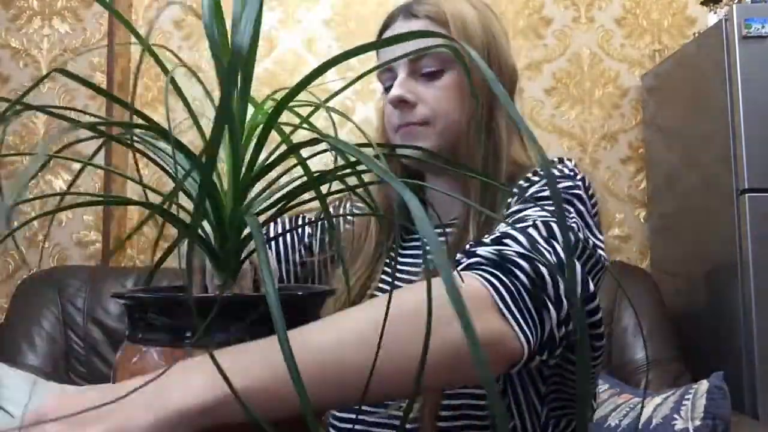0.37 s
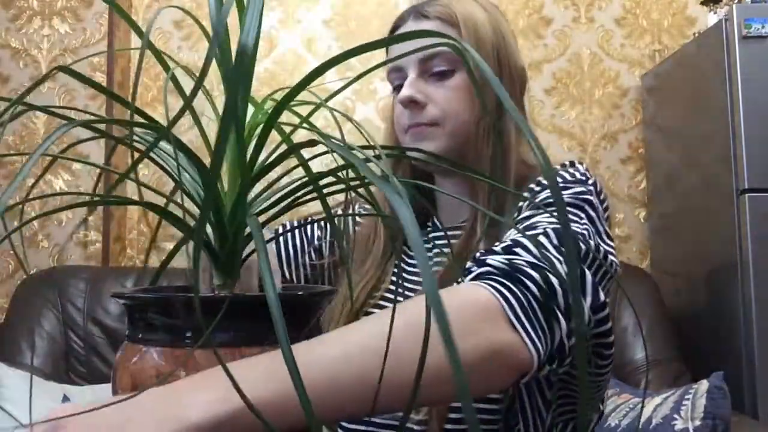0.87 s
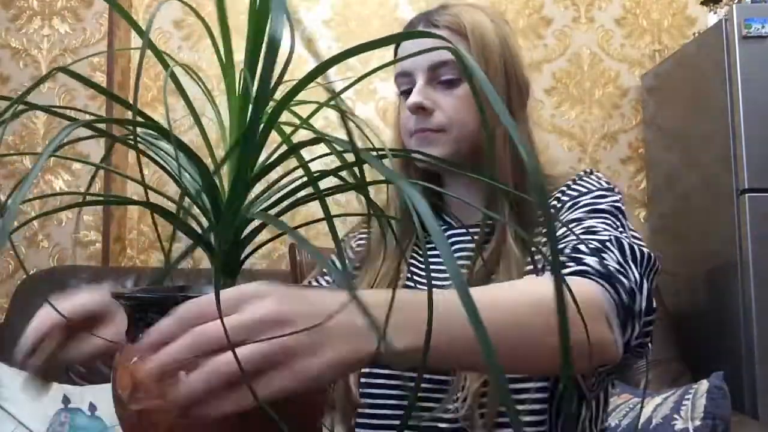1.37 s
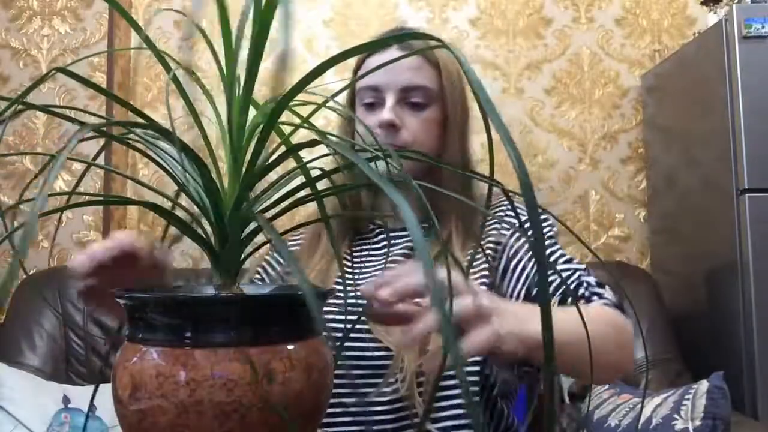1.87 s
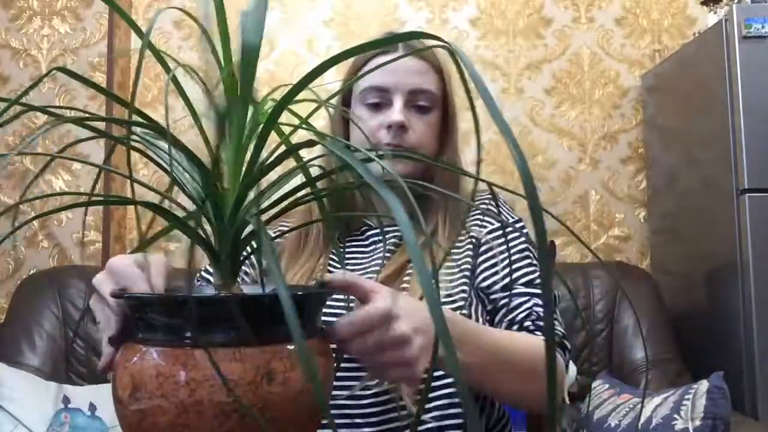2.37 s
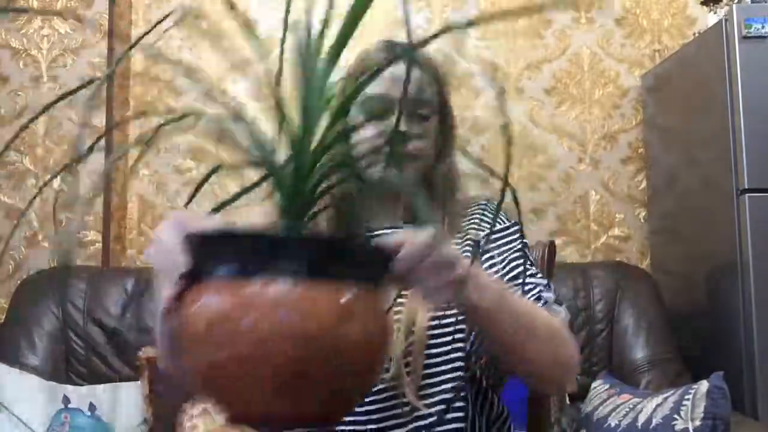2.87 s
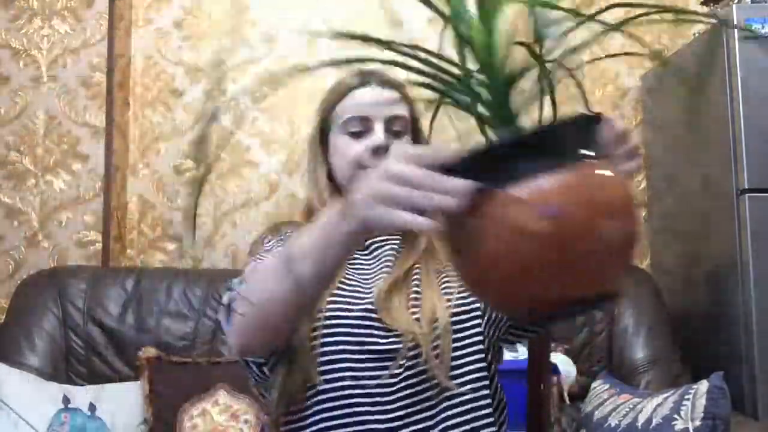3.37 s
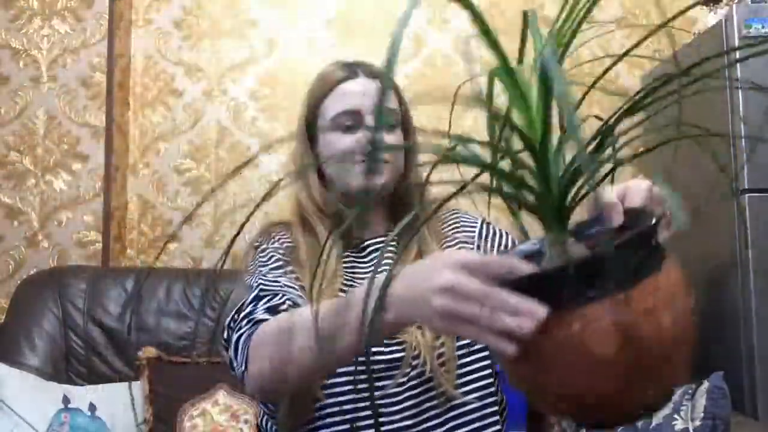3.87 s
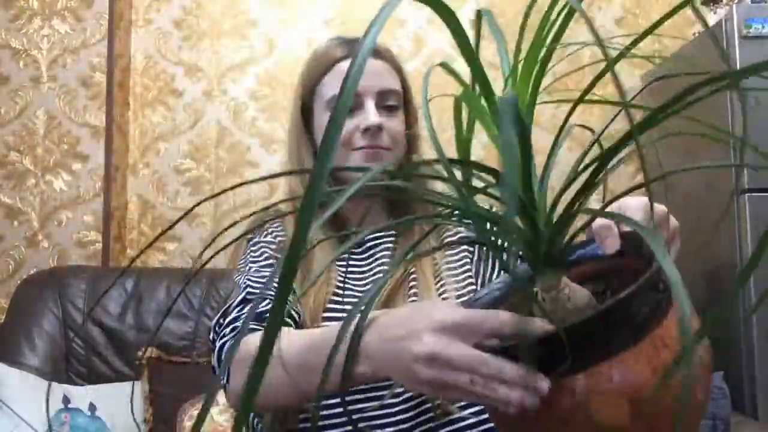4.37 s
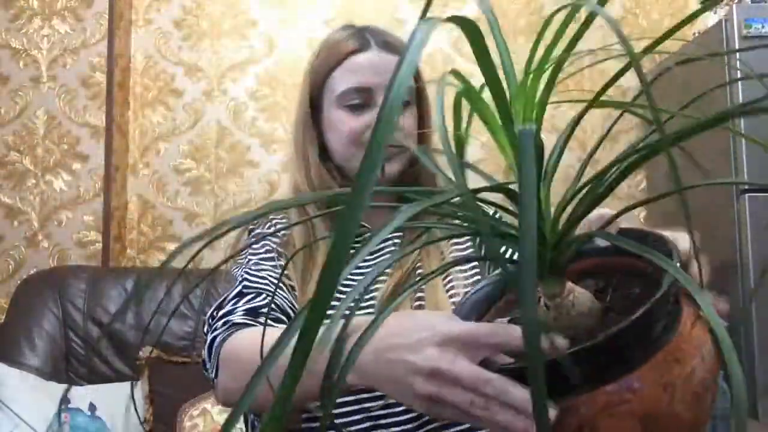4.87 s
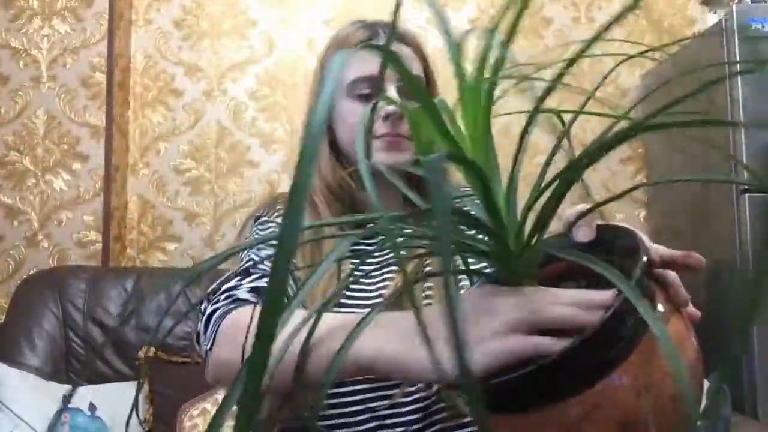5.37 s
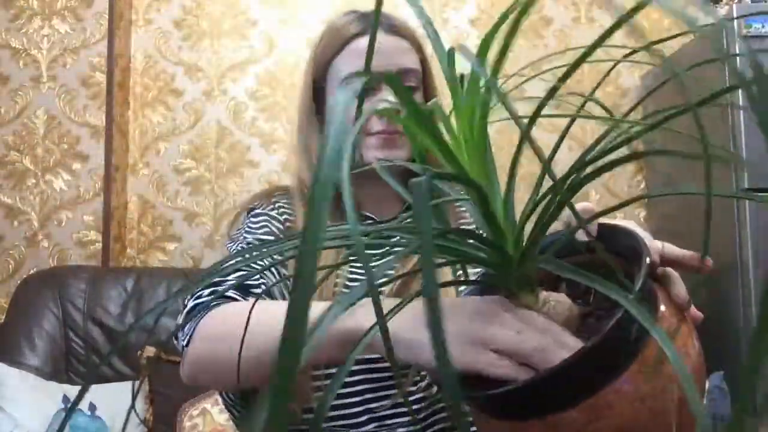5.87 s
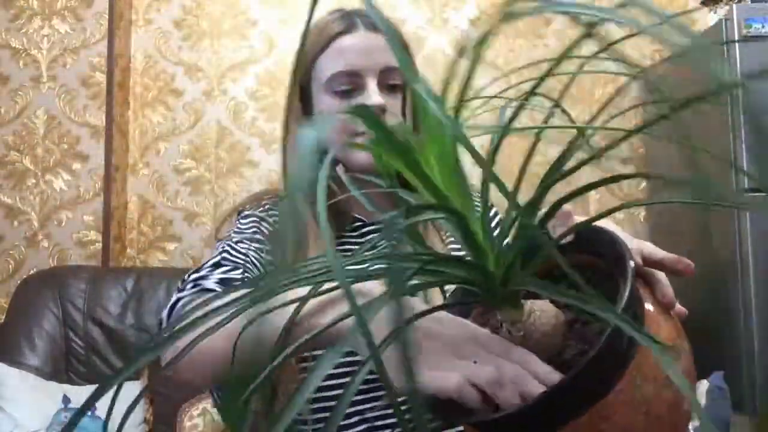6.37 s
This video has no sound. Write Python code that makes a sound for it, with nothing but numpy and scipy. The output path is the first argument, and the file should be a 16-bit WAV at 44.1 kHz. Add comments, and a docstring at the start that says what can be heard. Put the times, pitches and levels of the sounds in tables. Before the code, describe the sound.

Quiet rustling in a living room, a sudden rattling topple, later one deep pot thud, then fingers ticking and scratching through dry soil.

```python
"""A light hollow object topples and clatters to rest on a table: impulsive contacts excite its decaying modes.
A heavy clay pot is dragged and set down with a thud, and fingers tap it faintly: soft pushes ring a set of modes,
friction is noise about a pitch. Stiff leaves and fingers in the soil rustle and tick (noise bursts, fine grains),
with two woody taps at the end; a hand sets something light down, a finger rubs the glaze and a ring clinks on it.
The furnished living room adds a diffuse tail and a faint hum of filtered noise."""
import sys
import numpy as np
from scipy import signal
from scipy.io import wavfile

SR = 44100
rng = np.random.default_rng(int(sys.argv[2]) if len(sys.argv) > 2 else 0)


def decibels_to_gain(level_db):
    """Convert a level in decibels to a linear amplitude gain (20 dB per decade)."""
    exponent = np.asarray(level_db, float) / 20
    return 10 ** exponent


def wrap_up_sound(samples):
    """Save the sound to the file named by the first command line argument, as 16-bit audio."""
    columns = np.atleast_2d(samples).T
    # keep every value between -1 and 1, then stretch to whole-number steps
    tamed = np.clip(columns, -1, 1)
    steps = np.round(tamed * 32767).astype(np.int16)
    wavfile.write(sys.argv[1], SR, steps)


N = 286650

# hard contacts of the toppling object; the gentlest are softened further in clatter():
# (time [s], crack peak [dB], body ring re crack [dB], crack pitch [Hz])
CONTACTS = [(1.6124, -34.5, 18, 2520), (1.6214, -14, 8, 2170), (1.6295, -21, -5.5, 1720),
            (1.6445, -30, 6, 3080), (1.6776, -32.5, -7, 4770), (1.6951, -11, -12, 3330),
            (1.704, -8.5, -6, 2480), (1.7215, -39, -1, 3600), (1.7578, -2.5, -1.5, 2800),
            (1.7922, -10, -4.5, 3770), (1.7947, -5, -15.5, 3130), (1.799, 1.5, -7.5, 2950),
            (1.8187, -18, -2, 3302), (1.8216, -14.5, 1.5, 2977), (1.831, -23, -6, 3200),
            (1.847, -16.5, -1, 3070), (1.8574, -15, 3, 2930), (1.879, -12.5, -23, 2550),
            (1.8865, -15.5, 0.5, 3330), (1.902, -23, 1, 2900), (1.9097, -24, 6.5, 3050),
            (1.9359, -26, -2, 3300), (1.9455, -32, -9, 3500), (1.968, -31.5, -15, 3660),
            (1.9727, -31, -17, 3600), (2.0009, -34.5, 1.5, 1800), (2.048, -43, 5, 1500),
            (2.0834, -44.5, 14.5, 1920), (2.1522, -54, 14, 900), (2.167, -42, -4, 3600),
            (2.1818, -49, 13.5, 1710), (2.231, -43.5, 7.5, 1885), (2.274, -60.5, 10, 1400),
            (2.289, -51, 11.5, 1880), (2.3206, -50.5, 9.5, 1900), (2.343, -60, 7, 1000),
            (2.358, -58, 9.5, 1704), (2.3821, -54.5, 8.5, 1485), (2.432, -58.5, 8, 1100)]
# dense small contacts while it rocks and slides: (time [s], level [dB])
ROCKING_LEVEL = [(1.615, -36.5), (1.66, -33.5), (1.69, -34.5), (1.73, -36.5), (1.75, -37.5), (1.82, -30),
                 (1.89, -31.5), (1.97, -41), (2.06, -55.5)]
# modes of the hollow object: (frequency [Hz], level [dB], t60 [s])
HOLLOW_MODES = [(235, -7, .07), (280, -6, .07), (330, -5, .06), (385, -9, .05), (440, -8, .05),
                (535, -5, .07), (585, -5, .065), (665, -8, .04), (790, -7, .04), (870, -2, .05),
                (975, -6, .05), (1150, -3, .035), (1340, -1, .03), (1520, 0, .03), (1690, 0, .025),
                (1830, 0, .03), (2080, -4, .025), (2340, -4, .025), (2600, -6, .02), (2900, -7, .018),
                (3200, -8, .016), (3500, -9, .015), (3900, -12, .012), (4400, -14, .012), (5000, -16, .01)]
# a gentle contact stirs only some of the modes: (frequency [Hz], level [dB])
GENTLE_EXCITATION = [(250, -7), (440, -5.5), (560, 5), (670, -11.5), (870, -7.5), (975, 0), (1150, -5.5),
                     (1520, -14.5), (1830, -3.5), (2080, -5), (5000, -28.5)]
CRACK_EDGE_DB = -34.5  # bright edge of a crack, re its table peak
SCRAPE_EDGE_DB, SPRAY_DB, DRUM_DB = -13.5, -29.5, 3  # small contacts: bright edge, faint spray, drumming on the table
TOP_HZ = 5530  # the body is dull above
# then it wobbles softly to rest
WOBBLE_FROM_S, WOBBLE_TO_S, WOBBLE_DB, WOBBLE_FADE_DB_PER_S = 2.02, 2.52, -51, -14

# soft blows: the pot landing on the table, and faint finger taps on the pot:
# (time [s], peak [dB], push pitch [Hz], grit re peak [dB])
SOFT_BLOWS = [(.004, -50.5, 364, -35), (4.41, -34.5, 300, -16), (4.4196, -4.5, 312, -34.5),
              (4.4313, -9.5, 266, -36), (4.4436, -21.5, 670, -24), (4.4525, -34, 325.4, -22),
              (4.466, -30.5, 334, -21), (4.484, -26, 403, -27), (4.491, -44, 450, -28),
              (4.508, -29, 130, -32), (4.527, -31, 150, -28), (4.179, -52, 734, -23),
              (4.349, -51.5, 745, -16), (4.732, -45, 810, -21), (4.756, -34, 555, -33),
              (5.2890, -42, 674, -23), (6.229, -54, 198, -24)]
# modes that the soft blows ring, those of the table: (frequency [Hz], level [dB], t60 [s])
TABLE_MODES = [(121, 2, 0.1), (143, -8, 0.14), (222.3, -2, 0.07), (208, -3.5, 0.042), (256, -1.5, 0.018),
               (320, -4, 0.0312), (386, 2.5, 0.036), (474, -10.5, 0.094), (598, -4, 0.038),
               (642, -7, 0.092), (710, 1.5, 0.02896), (863, 3, 0.023), (1013, -1, 0.045), (1192, 1, 0.032),
               (1365, 2.5, 0.055), (1560, 3, 0.024), (1800, 7.5, 0.03)]
# what a blow sends through the table top into the microphone, re the blow's peak
THUMP_DB, THUMP_HZ, THUMP_T60_S = -31.5, 70, 0.34

# the pot's foot sliding before it lands: the rub starts high and broad, sinks and narrows as the weight settles
SLIDE_FROM_S, SLIDE_TO_S, SLIDE_RISE_S, SLIDE_DB = 4.04, 4.45, 0.1, -55
SLIDE_START_HZ, SLIDE_END_HZ, SETTLED_S, SETTLING_S = 332.8, 208, 4.23, 0.035

# a hand sets something light down: (time [s], peak [dB])
SET_DOWN = [(0.9218, -35), (0.938, -50.5), (0.968, -50), (1.018, -56.5)]
# modes of that light object: (frequency [Hz], level [dB], t60 [s])
LIGHT_MODES = [(242, -14, 0.15), (297, 4, 0.059), (365, -9, 0.023), (470, -17, 0.077), (612, -12, 0.064),
               (900, -15, .03), (970, -17, 0.065), (1200, -7, 0.018), (1730, -11, .025)]
KNOCK_SOFT_HZ = 900  # top of the soft push

# leaves and crumbs snapping, and at the end two woody taps:
# (time [s], peak of the body [dB], pitch [Hz], bright edge re peak [dB], broad noise re ringing [ratio])
SNAPS_AND_TAPS = [(0.0433, -54, 1900, -1.5, 1.2), (0.1191, -45.5, 1850, -32, 9.1),
                  (0.4209, -49, 4040, -11, 0.83), (0.5574, -64, 4190, -17, 0.51),
                  (1.2555, -49.5, 5250, -30, 0.91), (1.261, -41, 4670, -24, 0.85),
                  (1.3004, -53, 4430, -23, 2.1), (1.3927, -54, 2960, -23, 0.93), (2.4583, -54, 2800, -7, 2),
                  (2.5694, -56.5, 4500, -8, 1.67), (2.7034, -51, 4210, -11, 1.44),
                  (2.9682, -52, 6910, -19.5, 0.88), (3.2573, -55.5, 7970, -11.5, 0.81),
                  (3.4114, -58.5, 1428, -20, 1.2), (3.6671, -60, 1955, 3.5, 1.47),
                  (3.714, -57.5, 1470, 0, 1.4), (3.9569, -63, 1440, -16, 1.05),
                  (3.961, -52, 2200, -18, 1.9), (4.0514, -56.5, 7340, -13.5, 1.4),
                  (4.1091, -56, 2060, 0, 1.3), (4.1784, -45, 3200, -22.5, 2.6),
                  (4.3096, -45.5, 3660, -14.5, 3.8), (4.348, -43, 2920, -22, 2.7),
                  (4.4209, -34, 2050, -34, 0.86), (4.4304, -59, 3200, -19.5, 0.47),
                  (4.4445, -49.5, 2380, -19.5, 0.66), (4.5615, -45, 3030, -24, 5.6),
                  (4.7297, -39.5, 4200, -18, 0.58), (4.7526, -41, 2630, -20, 1.5),
                  (4.7795, -40, 2790, -27, 3.3), (4.8034, -66, 2880, -21, 1.2), (5.0, -50, 4440, -23, 1.4),
                  (5.0781, -59.5, 1395, -21, 1.6), (5.2883, -44, 1474, -13, 4.2),
                  (5.3707, -55, 1400, -15, 1.2), (5.4174, -55.5, 4550, -12, 1.2),
                  (5.5426, -51.5, 1920, -0.5, 1.2), (5.6576, -32, 3200, -18.5, 11),
                  (5.6823, -42.5, 2260, -12, 2.2), (5.7124, -48, 4970, 1.5, 1.1),
                  (5.7942, -50.5, 2620, -21, 0.73), (5.882, -56, 2940, -14.5, 1),
                  (6.0871, -49.5, 3820, -16, 1.6), (6.2342, -34, 3980, -25, 3.9),
                  (6.2802, -51, 4300, -20, 1.1), (6.4834, -59.5, 4010, -22, 1.3),
                  (6.318, -46, 1560, -20, 0.2), (6.3265, -47, 1584, -20, 0.14)]
SNAP_RISE_S, SNAP_FALL_S = 0.0036, 0.0021  # time constants
# the many snaps too faint to point at; FAINT_SNAP_DB is the weakest
FAINT_SNAPS_PER_S, FAINT_SNAP_DB, FAINT_EDGE_DB, FAINT_BROAD_SHARE = 3.9, -67, -7.5, 1.6

# stiff leaves swishing along each other: (time [s], spread of the swell [s], level [dB], pitch [Hz])
LEAF_SWISHES = [(1.1, .03, -76, 3900), (2.594, .01, -73, 3000), (2.687, .015, -67.5, 4240),
                (2.69, .015, -71.5, 7720), (2.756, .015, -69.5, 3810), (2.815, 0.01, -71, 1510),
                (2.845, .02, -77, 4500), (3.046, .015, -74, 5170), (3.072, .012, -71, 6040),
                (3.184, .01, -77, 6000), (4.202, 0.024, -69, 3600), (4.277, 0.006, -65, 4300),
                (4.29, 0.012, -68.5, 3200), (4.372, 0.009, -63, 2830), (4.765, 0.023, -83, 2000),
                (5.8, 0.026, -66, 2840), (5.91, 0.015, -73.5, 2940)]

# hands at work: (time [s], rustle level [dB], rumble of forearms and sleeves on the table [dB])
HAND_LEVELS = [(0, -68.5, -62.5), (.33, -73.5, -70.5), (.6, -77, -67), (.92, -80.5, -68.5),
               (1.08, -72, -69.5), (1.58, -70, -64), (2.5, -73, -68), (2.65, -70.5, -69.5),
               (3.0, -70.5, -70), (3.4, -74.5, -69), (3.9, -72.5, -69), (4.4, -68.5, -62.5),
               (4.93, -67, -61.5), (5.35, -69, -66), (5.65, -60.5, -63), (5.87, -70, -64),
               (6.1, -65.5, -64.5), (6.3, -68.5, -63), (6.5, -69, -66)]
# leaves brushing past skin or rim: (time [s], rustle level [dB], sheen re rustle [dB], time constant [s])
LEAF_BRUSHES = [(0.051, -61, -16, 0.0052), (0.392, -89, 11, 0.017), (0.632, -95, 5, 0.013),
                (0.77, -77.5, -0.5, 0.023), (0.921, -74, -4, 0.015), (1.267, -54, -25, 0.0045),
                (2.704, -68, 3, 0.011), (2.97, -78, 10, 0.011), (3.269, -72.5, -6.5, 0.037),
                (3.48, -80.5, 1.5, 0.019), (3.79, -78, 3, 0.052), (3.967, -60.5, -10, 0.014),
                (4.197, -65.5, -7, 0.027), (4.315, -68, 6, 0.007), (4.808, -58.5, -34, 0.068),
                (5.088, -64, -3.5, 0.019), (5.158, -67.5, 2, 0.0093), (5.474, -73.5, 10.5, 0.014),
                (5.665, -56.5, 5.5, 0.01), (5.716, -66, 9, 0.01), (6.089, -61.5, -4, 0.015),
                (6.239, -52.5, -16.5, 0.007), (6.5, -58.5, -18, 0.02)]
# relative spectral density of the rustle: (frequency [Hz], level [dB])
RUSTLE_SPECTRUM = [(290, -42.5), (500, 6.5), (689, 2), (1220, 0), (1840, 0), (1990, -4), (2960, -1),
                   (3380, -5), (4310, -2), (7000, -15.5), (9100, -40), (15400, -120)]
# relative spectral density of the dry treble of the rustle: (frequency [Hz], level [dB])
SHEEN_SPECTRUM = [(3530, -34), (6000, -9.5), (7640, 1.5), (8650, -6.5), (11100, -6), (16000, -12.5)]
SHEEN_DB, SHEEN_WANDER_DB = -9, 3.5  # dry treble re rustle, and rms of its wandering
# relative spectral density of the arms on the table: (frequency [Hz], level [dB])
ARMS_SPECTRUM = [(24, -43), (40, -13), (70, 1), (124, 1), (172, -3.5), (218, 0), (271, -4), (900, -16),
                 (1170, -39), (1980, -120)]

# pressure of the finger rubbing the glaze: (time [s], level [dB])
RUB_PRESSURE = [(5.73, -69), (5.8, -69.5), (5.87, -77.5), (5.92, -77.5), (5.97, -71), (6.1, -75),
                (6.24, -76.5)]
# tones of the rub: (frequency [Hz], level [dB], share of the pitch lift [ratio])
RUB_PITCHES = [(865, 4.5, 0.089), (2480, 5, 0.83), (4180, -1.5, 0.0072)]
RUB_FROM_S, RUB_TO_S, RUB_RISE_S = 5.73, 6.24, 0.022
RUB_SHARP, RUB_SLOWING_S = 0.16, 0.07  # pitch lift of the quick start at full share; time constant of slowing
RUB_STUTTER_DB = 3  # rms; the skin grips and lets go

# finger ring on the glaze:
# (time [s], level [dB], t60 of the lowest mode [s], upper modes re lowest [dB])
RING_CLINKS = [(3.785, -61, 0.52, -5), (3.816, -77, 0.9, -30), (4.084, -73.5, 0.49, -25),
               (4.147, -66.5, 0.32, -5.5), (5.15, -58, 0.18, -3.5)]
# modes of the pot; the clinks give the lowest its level and t60: (frequency [Hz], level [dB], t60 [s])
POT_MODES = [(2572, 0, .4), (5593, -8, .1), (7920, 0, .13)]

# relative spectral density of the room's hum: (frequency [Hz], level [dB])
HUM_SPECTRUM = [(15, -40), (25, -12), (74, 2.5), (212, 4), (427, -5.5), (607, -11), (1130, -18),
                (1400, -14), (6050, -29), (6920, -14), (8360, -37), (12200, -31), (16000, -45.5)]
HUM_DB = -74

# decay of the room: (frequency [Hz], t60 [s])
ROOM_DECAY = [(100, 0.22), (300, 0.34), (1000, 0.3), (4000, 0.16), (10000, 0.3)]
# soft furniture swallows the treble: (frequency [Hz], relative level [dB])
ROOM_TINT = [(200, -0.5), (1500, -1.5), (3500, -4.5), (6000, -8), (12000, -7)]
ROOM_DB = -10.5


def clatter():
    """Modal impact: each contact cracks and strikes every mode of the hollow body with a strength of its own."""
    contacts, out, edges = np.array(CONTACTS), np.zeros(N), np.zeros(N)
    times, peaks_db, bodies_db = contacts[:, :3].T
    white = rng.standard_normal((len(contacts), 400)) * np.exp(-np.arange(400) / (0.0005 * SR))
    white[:, 0] = 4.0  # the first touch leads
    weak = np.clip((-30 - peaks_db) / 10, 0, 1)  # gentle contacts sound duller
    for (s, peak_db, body_db, hz), burst, soft in zip(contacts, white, weak):
        crack = peak_one(band_pass(burst, hz / 2.0, hz * 1.3, order=3))
        add(out, s, decibels_to_gain(peak_db - 12 * soft) * crack)
        edge = peak_one(band_pass(burst, 5000, 9000))
        add(edges, s, decibels_to_gain(peak_db + CRACK_EDGE_DB) * edge)
    shape = (len(contacts), len(HOLLOW_MODES))
    strikes = decibels_to_gain(3 * rng.standard_normal(shape)) * rng.choice([-1, 1], shape)
    small = during(ROCKING_LEVEL) * decibels_to_gain(in_time(ROCKING_LEVEL)[0]) * grains(700, spread_db=3)
    wobble_db = WOBBLE_DB + WOBBLE_FADE_DB_PER_S * (np.arange(N) / SR - WOBBLE_FROM_S)
    wobble = swell(WOBBLE_FROM_S, WOBBLE_TO_S, 0.027) * decibels_to_gain(wobble_db) * grains(110, spread_db=4)
    for k, (hz, level_db, t60) in enumerate(HOLLOW_MODES):
        dull_db = -6 * max(np.log2(hz / 1900), 0)
        gentle_db = at_hz(GENTLE_EXCITATION, hz)
        wobble_dull_db = -8.6 * max(np.log2(hz / 800), 0)
        touches = decibels_to_gain(dull_db) * small + decibels_to_gain(gentle_db + wobble_dull_db) * wobble
        # long modes gather more energy: divide it out
        clicks = touches * rng.standard_normal(N) / np.sqrt(SR * t60)
        blow = decibels_to_gain(peaks_db + bodies_db + weak * gentle_db) * strikes[:, k]
        clicks[np.round(times * SR).astype(int)] += blow / np.sqrt(len(HOLLOW_MODES))
        out += decibels_to_gain(level_db) * ring(clicks, hz, t60)
    out += decibels_to_gain(SCRAPE_EDGE_DB) * band_pass(small, 2200, 4300)
    edges += decibels_to_gain(SPRAY_DB) * band_pass(small, 5800, 9000)
    drumming = decibels_to_gain(DRUM_DB) * band_pass(small, 200, 380)
    # a small light body has little bass and a dull top
    return band_pass(out, 200, TOP_HZ, order=4) + edges + drumming


def soft_blows():
    """Soft impact: a push, broad around its pitch, rings a set of modes; grit adds a short knock."""
    out, click = np.zeros(N), np.eye(1, SR // 3)[0]
    grit = rng.standard_normal((len(SOFT_BLOWS), 3000)) * np.exp(-np.arange(3000) / (0.011 * SR))
    for (s, peak_db, hz, grit_db), burst in zip(SOFT_BLOWS, grit):
        push = band_pass(click, hz / 2.08, hz * 1.665, order=3)
        body = sum(decibels_to_gain(level_db) * ring(push, mode_hz, t60) for mode_hz, level_db, t60 in TABLE_MODES)
        add(out, s, -decibels_to_gain(peak_db) * peak_one(body))
        add(out, s, decibels_to_gain(peak_db + grit_db) * peak_one(band_pass(burst, 960, 2500)))
    return out


def thumps():
    """Structure-borne sound: each soft blow also shakes the microphone, deep noise that builds up and dies."""
    out, t = np.zeros(N), np.arange(SR // 2) / SR
    envelope = decibels_to_gain(-60 * t / THUMP_T60_S) * np.minimum(t / 0.09, 1) ** 2
    for s, peak_db, *_ in SOFT_BLOWS:
        burst = rng.standard_normal(len(t)) * envelope
        deep = peak_one(band_pass(burst, THUMP_HZ / 2.2, THUMP_HZ * 2.4))
        add(out, s, decibels_to_gain(peak_db + THUMP_DB) * deep)
    return out


def slide():
    """Sliding friction: noise gathered around one pitch that sinks as the weight settles."""
    light = 0.5 - 0.5 * np.tanh((np.arange(N) / SR - SETTLED_S) / (2 * SETTLING_S))
    hz = SLIDE_END_HZ + (SLIDE_START_HZ - SLIDE_END_HZ) * light
    friction = rough_tone(hz, np.clip(0.13 + 1.2 * light, 0, 1))
    return decibels_to_gain(SLIDE_DB) * swell(SLIDE_FROM_S, SLIDE_TO_S, SLIDE_RISE_S) * friction


def knocks():
    """Modal impact: a soft push rings the light object, which settles in weaker touches."""
    out, push = np.zeros(N), band_pass(np.eye(1, SR // 4)[0], 100, KNOCK_SOFT_HZ)
    for s, peak_db in SET_DOWN:
        scatter_db = 2 * rng.standard_normal(len(LIGHT_MODES))
        body = sum(decibels_to_gain(level_db + more_db) * ring(push, hz, t60)
                   for (hz, level_db, t60), more_db in zip(LIGHT_MODES, scatter_db))
        add(out, s, -decibels_to_gain(peak_db) * peak_one(body))
    return out


def ticks():
    """Impulsive noise: a snap or tap is a dying burst, part of it resonant, with a bright edge; faint ones at random."""
    out, t = np.zeros(N), np.arange(2000) / SR
    draw = rng.random((round(FAINT_SNAPS_PER_S * N / SR), 3))
    faint = [(when * N / SR, FAINT_SNAP_DB + 8 * size, 1400 * 3.2 ** pitch, FAINT_EDGE_DB, FAINT_BROAD_SHARE)
             for when, size, pitch in draw]
    envelope = np.exp(-t / SNAP_FALL_S) * (1 - np.exp(-t / SNAP_RISE_S))
    for s, peak_db, hz, edge_db, broad in list(SNAPS_AND_TAPS) + faint:
        burst = rng.standard_normal(len(t)) * envelope
        noise = peak_one(band_pass(burst, hz / 2.0, hz * 1.6))
        ringing = peak_one(ring(burst, hz, 36.0 / hz))
        body = peak_one(max(broad, 0) * noise + ringing)
        edge = peak_one(band_pass(burst, 7100, 19000))
        add(out, s, decibels_to_gain(peak_db) * (body + decibels_to_gain(edge_db) * edge))
    return out


def swishes():
    """Granular friction: a short swell of fine grains gathered around one pitch."""
    out, fine = np.zeros(N), grains(3000, spread_db=3)
    for s, spread, level_db, hz in LEAF_SWISHES:
        t = np.arange(-3 * spread, 3 * spread, 1 / SR)
        at = round((s + t[0]) * SR)
        noise = rms_one(band_pass(fine[at:at + len(t)], hz / 1.13, hz * 1.16))
        add(out, s + t[0], decibels_to_gain(level_db) * np.exp(-0.5 * (t / spread) ** 2) * noise)
    return out


def rustle():
    """Granular noise: leaves and soil rustle in very fine grains, in bursts where a leaf brushes past."""
    rustle_db = in_time(HAND_LEVELS)[0]
    body, sheen = decibels_to_gain(rustle_db), decibels_to_gain(rustle_db + SHEEN_DB + SHEEN_WANDER_DB * drift(4.9))
    for s, level_db, sheen_db, length in LEAF_BRUSHES:
        pass_by = decibels_to_gain(level_db) * np.exp(-np.abs(np.arange(N) / SR - s) / max(length, 0.003))
        # unrelated noises add in power
        body, sheen = np.hypot(body, pass_by), np.hypot(sheen, decibels_to_gain(sheen_db) * pass_by)
    fine = [grains(9000, spread_db=2.5) for side in range(2)]
    dry_treble = sheen * coloured(fine, SHEEN_SPECTRUM, patchy_db=1.2)
    return body * coloured(fine, RUSTLE_SPECTRUM, patchy_db=0.8) + dry_treble


def arms():
    """Friction noise of low pitch: forearms and sleeves rumble softly on the table."""
    level_db = in_time(HAND_LEVELS)[1]
    return decibels_to_gain(level_db) * coloured(rng.standard_normal((2, N)), ARMS_SPECTRUM, patchy_db=0.8)


def rub():
    """Stick-slip friction: noise around three tones, broad and sharp at first, thinning as the finger slows."""
    since = np.clip(np.arange(N) / SR - RUB_FROM_S, 0, None)
    speed = np.exp(-since / RUB_SLOWING_S)
    wide = np.clip(0.39 + 2 * speed, 0, 1)
    tones = sum(decibels_to_gain(level_db) * rough_tone(hz * (1 + RUB_SHARP * share * speed), wide)
                for hz, level_db, share in RUB_PITCHES)
    pressure_db = in_time(RUB_PRESSURE)[0] + RUB_STUTTER_DB * drift(5.5)
    return decibels_to_gain(pressure_db) * swell(RUB_FROM_S, RUB_TO_S, RUB_RISE_S) * tones


def clinks():
    """Lightly damped modes of glazed clay under metal; the hold of the hand sets how long the lowest rings."""
    out, click = np.zeros(N), np.eye(1, SR // 2)[0]
    for s, level_db, low_t60, upper_db in RING_CLINKS:
        add(out, s, decibels_to_gain(level_db) * ring(click, POT_MODES[0][0], low_t60))
        upper = sum(decibels_to_gain(mode_db) * ring(click, hz, t60) for hz, mode_db, t60 in POT_MODES[1:])
        add(out, s, decibels_to_gain(level_db + upper_db) * upper)
    return out


def room(x):
    """Diffuse reverberation: noise sets in after the first reflections and decays exponentially band by band."""
    t = np.arange(SR) / SR
    tail = sum(band * decibels_to_gain(at_hz(ROOM_TINT, hz) - 60 * t / at_hz(ROOM_DECAY, hz))
               for hz, band in bands(rng.standard_normal((2, SR))))
    tail *= 1 - np.exp(-(t / 0.0034) ** 2)
    return signal.fftconvolve(x, tail / np.sqrt(np.sum(tail ** 2)))[:N]


def room_hum():
    """Stationary background: noise shaped by a spectrum, its bands flickering a little."""
    return decibels_to_gain(HUM_DB) * coloured(rng.standard_normal((2, N)), HUM_SPECTRUM, patchy_db=1.25)


def ring(clicks, hz, t60):
    """Damped oscillator: a unit click sets a sine of initial height 1 ringing."""
    r, w = decibels_to_gain(-60 / (max(t60, 0.001) * SR)), 2 * np.pi * hz / SR
    return signal.lfilter([0, np.sin(w)], [1, -2 * r * np.cos(w), r * r], clicks + 1e-18)


def rough_tone(hz, wide):
    """Narrow-band noise: random quadrature amplitudes on a moving pitch; wide runs from thin 0 to broad 1."""
    phase = 2 * np.pi * np.cumsum(hz) / SR
    parts = [wide * drift(160) + (1 - wide) * drift(18) for part in range(2)]
    return parts[0] * np.cos(phase) + parts[1] * np.sin(phase)


def grains(per_s, spread_db):
    """Shot noise: random clicks of very uneven size, scaled to rms 1."""
    sizes = decibels_to_gain(spread_db * np.minimum(rng.exponential(1, N), 5)) * rng.choice([-1, 1], N)
    return rms_one(sizes * (rng.random(N) < per_s / SR))


def drift(rate):
    """Low-passed noise: a slow random course of rms 1, with its corner near rate [Hz]."""
    r = np.exp(-80 * np.pi * rate / SR)  # one value every 40 samples
    slow = signal.lfilter([1], [1, -2 * r, r * r], rng.standard_normal(N // 40 + 2002))[2000:]
    return np.interp(np.arange(N) / 40, np.arange(len(slow)), rms_one(slow))


def coloured(sources, spectrum, patchy_db):
    """Spectral shaping: bands at their own level, flickering together and alone; rms 1."""
    together = drift(27)
    out = np.zeros(N)
    for hz, band in bands(sources):
        level_db = at_hz(spectrum, hz)
        if level_db > -55:
            out += band * decibels_to_gain(level_db + patchy_db * (0.88 * together + drift(30)))
    return rms_one(out)


def bands(sources):
    """Third-octave analysis, neighbours cut from unrelated sources: (centre [Hz], band)."""
    edges = 25 * 2 ** np.arange(0, 9.5, 1 / 3)
    for k, (low, high) in enumerate(zip(edges, edges[1:])):
        sos = signal.butter(2, [low, high], "band", fs=SR, output="sos")
        yield np.sqrt(low * high), signal.sosfilt(sos, sources[k % 2])


def band_pass(x, low_hz, high_hz, order=2):
    """Linear filtering: a Butterworth band."""
    sos = signal.butter(order, [low_hz, min(high_hz, 20000)], "band", fs=SR, output="sos")
    return signal.sosfilt(sos, x)


def swell(start, end, rise):
    """Amplitude envelope: grows as a square over the rise time, fades linearly over the last 50 ms."""
    t = np.arange(N) / SR
    return np.clip((t - start) / rise, 0, 1) ** 2 * np.clip((end - t) / 0.05, 0, 1)


def during(rows):
    """Time gate: true while a curve lasts."""
    return (np.arange(N) > rows[0][0] * SR) & (np.arange(N) < rows[-1][0] * SR)


def in_time(rows):
    """Linear interpolation: the columns of a curve at every sample."""
    s, *columns = np.transpose(rows)
    return [np.interp(np.arange(N) / SR, s, c) for c in columns]


def at_hz(points, hz):
    """Interpolation on a logarithmic frequency axis."""
    return np.interp(np.log(hz), np.log(np.array(points)[:, 0]), np.array(points)[:, 1])


def add(out, s, sound):
    """Superposition: mix a short sound in at a time."""
    at = round(s * SR)
    out[at:at + len(sound)] += sound[:N - at]


def rms_one(x):
    """Power normalization: scale to rms 1."""
    return x / np.sqrt(np.mean(x ** 2) + 1e-20)


def peak_one(x):
    """Peak normalization: scale to peak 1."""
    return x / np.abs(x).max()


def scene():
    """Superposition: direct and reverberant contacts over rustle and hum; small bodies radiate no deep bass."""
    contacts = clatter() + soft_blows() + slide() + knocks() + ticks() + swishes() + rub() + clinks()
    in_room = contacts + decibels_to_gain(ROOM_DB) * room(contacts)
    no_bass = signal.sosfilt(signal.butter(3, 90, "high", fs=SR, output="sos"), in_room)
    return (no_bass + thumps() + rustle() + arms() + room_hum())[None]


def roll_off(x):
    """The treble ends steeply here."""
    return signal.sosfilt(signal.butter(12, 15850, fs=SR, output="sos"), x)


def record(dry):
    """Amplitude limiting: full scale is the ceiling."""
    limited = np.clip(dry, -1, 1)
    return roll_off(limited)


dry = scene()
out = record(dry)
wrap_up_sound(out)
```